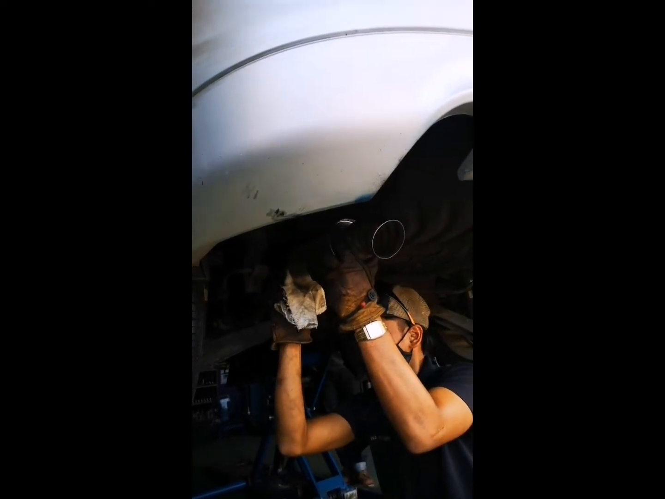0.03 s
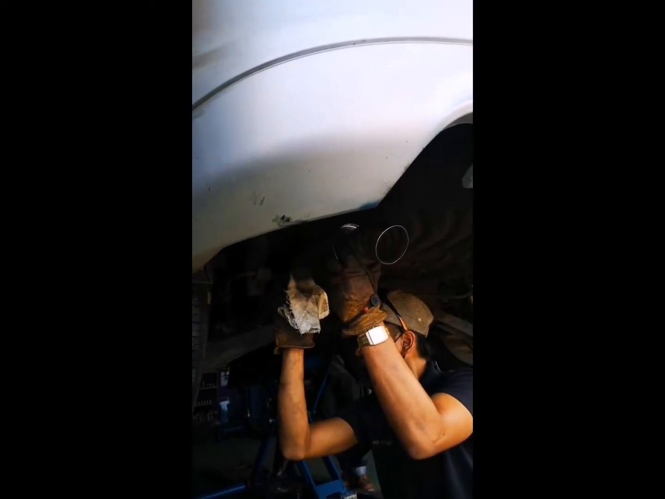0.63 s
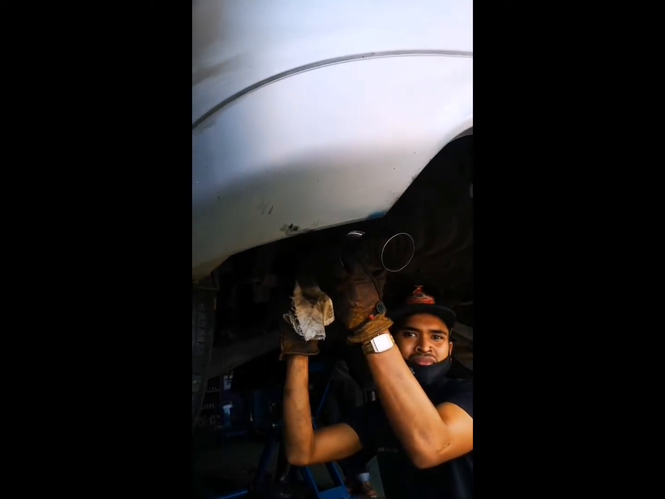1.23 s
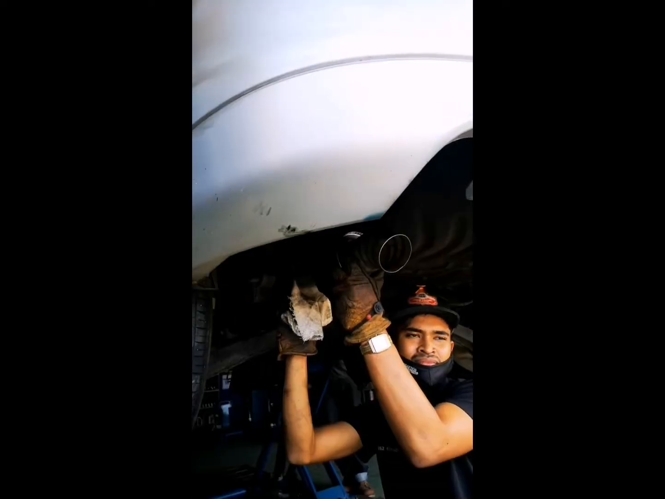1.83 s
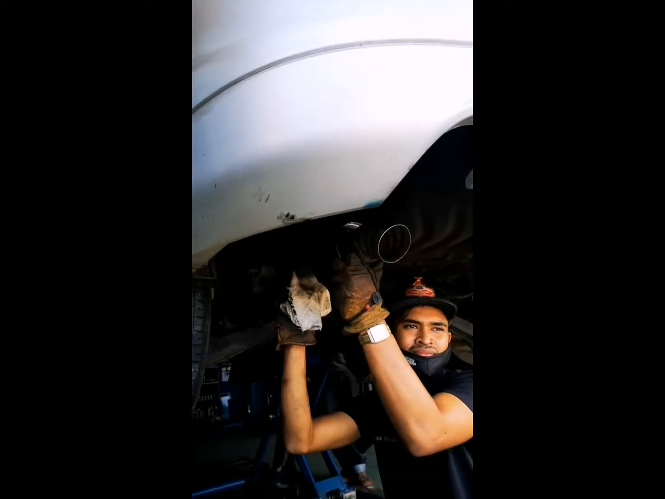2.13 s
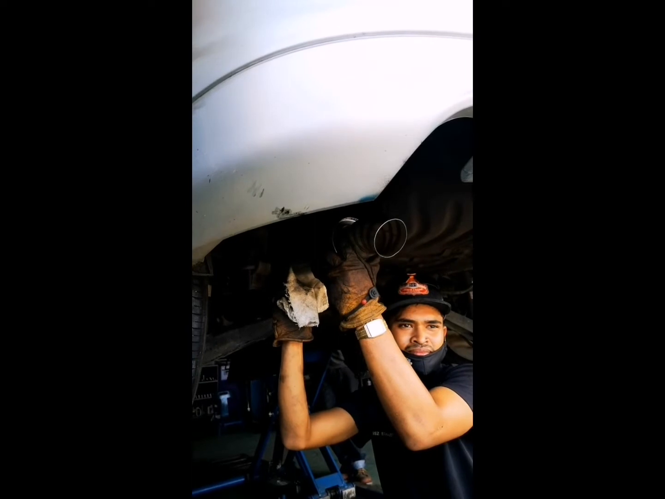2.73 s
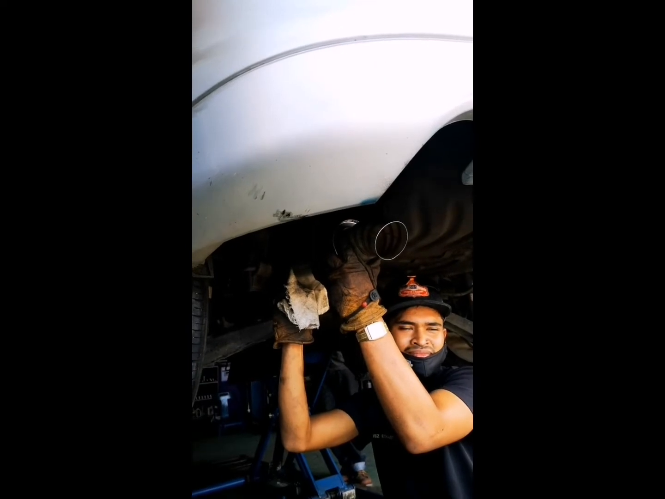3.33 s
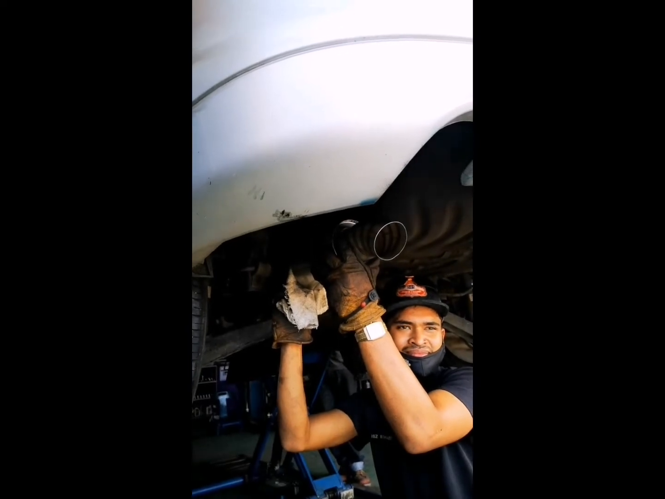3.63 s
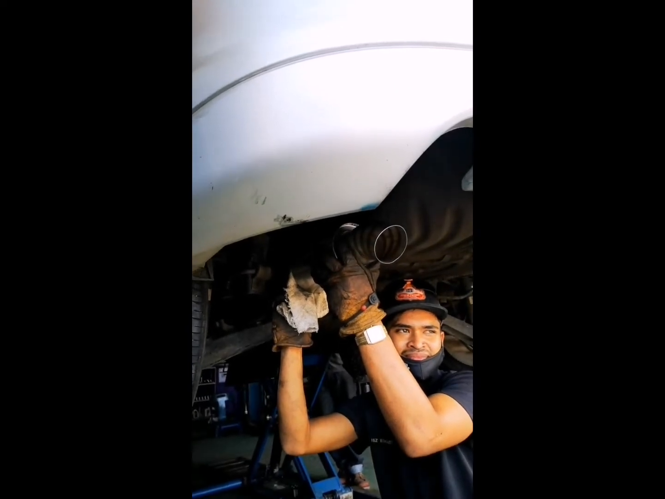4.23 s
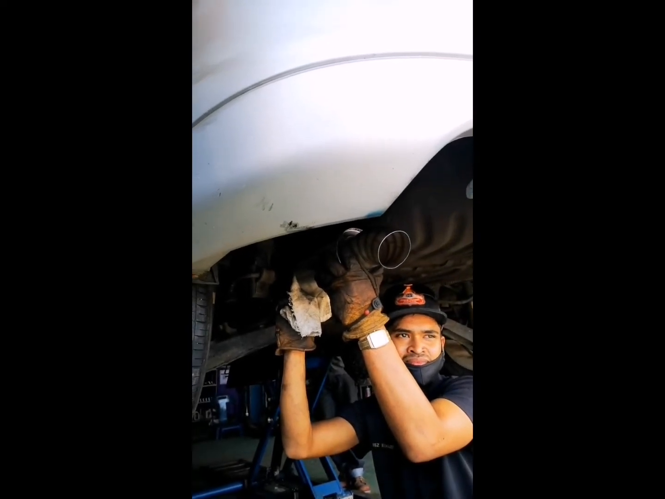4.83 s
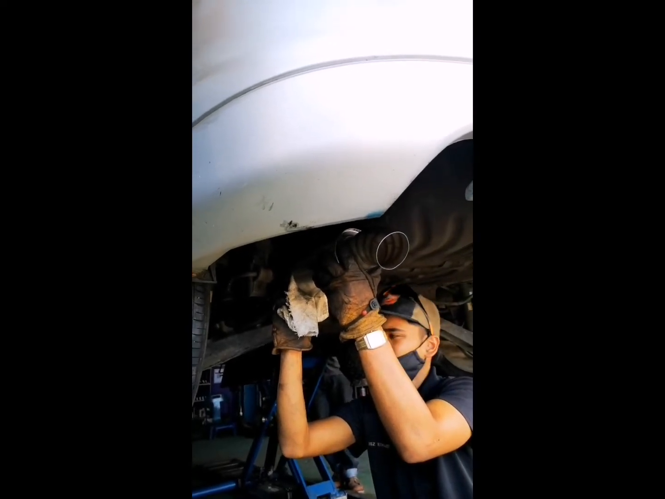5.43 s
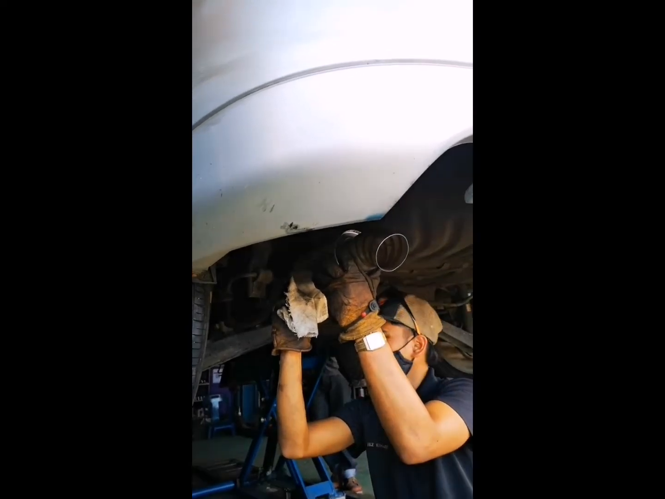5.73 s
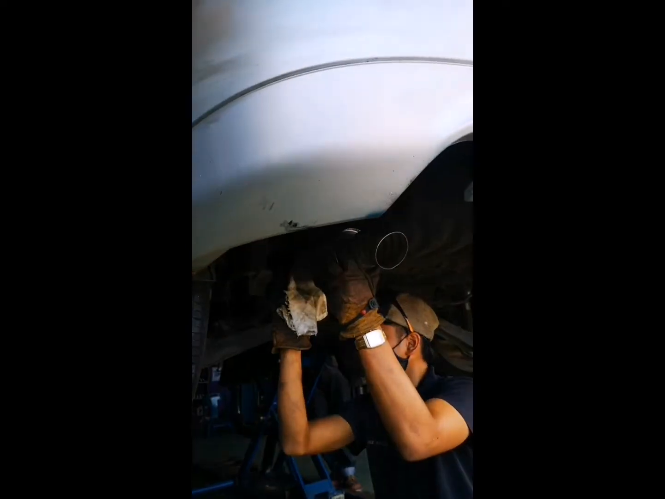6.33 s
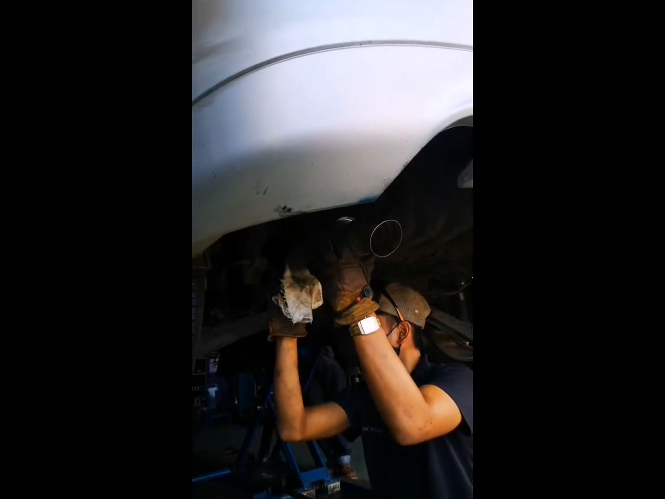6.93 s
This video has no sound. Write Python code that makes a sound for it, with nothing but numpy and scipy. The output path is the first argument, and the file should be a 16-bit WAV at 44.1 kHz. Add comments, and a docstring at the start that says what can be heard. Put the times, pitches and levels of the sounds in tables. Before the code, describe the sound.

Heard in stereo from just behind the tailpipe, a car engine in a workshop goes from a brief, low idle into three revs in a row. The exhaust booms as the pitch rises, then rumbles and burbles as it drops, never settling back to idle. A broad rush and hiss swells with every rev, along with a light belt whine and hollow metallic hoots. The loudest booms briefly push everything else down.

```python
"""Three revs in the workshop

A four-cylinder car idles on a lift and is revved three times; a stereo pair stands close to the
tailpipe. Firing pulses boom through the pipe, turn uneven and burble as the throttle shuts, and the
silencer shell rings. Gas, fan and belts rush and whine with the engine speed; a thin whistle sounds
at idle. The recorder's gain control ducks everything, the rushing too, under the loudest booms."""
import sys
import numpy as np
from scipy import signal
from scipy.fft import rfft, irfft
from scipy.io import wavfile
from scipy.ndimage import uniform_filter1d, minimum_filter1d

SR = 44100
rng = np.random.default_rng(int(sys.argv[2]) if len(sys.argv) > 2 else 0)


def wav_record(signal):
    """Record a signal, one row per channel, as 16-bit PCM in the file named by sys.argv[1]."""
    frames = np.transpose(np.atleast_2d(signal))
    bounded = np.clip(frames, -1, 1)
    # unit amplitude maps onto the largest positive 16-bit level
    quanta = np.round(bounded * 32767).astype(np.int16)
    wavfile.write(sys.argv[1], SR, quanta)


N = 308259
TIME = np.arange(N) / SR
BINS = np.maximum(np.arange(N // 2 + 1) * SR / N, 1)  # Hz


def from_db(db):
    """Decibels to gain."""
    return 10 ** (np.asarray(db) / 20)


def rms_one(x):
    """Scale to unit power."""
    return x / np.sqrt(np.mean(x ** 2) + 1e-20)


def columns_at(rows, where):
    """Read a table along its first column, a time or an engine speed."""
    axis, *columns = np.transpose(rows)
    return [np.interp(where, axis, column) for column in columns]


def at_hz(points, hz):
    """Read a table on a log-frequency axis."""
    frequencies, values = np.transpose(points)
    return np.interp(np.log(hz), np.log(frequencies), values)


def colour(x, spectrum):
    """Give a steady sound a spectrum; rms 1."""
    return rms_one(irfft(rfft(x) * from_db(at_hz(spectrum, BINS)), N))


def drift(rate_hz):
    """Slow random wandering with spread 1, drawn at every 16th sample."""
    count = N // 16 + 2
    hz = np.arange(count // 2 + 1) * SR / N
    slow = irfft(rfft(rng.standard_normal(count)) / (1 + (hz / rate_hz) ** 2) ** 2, count)
    return np.interp(np.arange(N) / 16, np.arange(count), rms_one(slow))


def narrow_tone(turns, width_hz):
    """A resonance fed by turbulence: a tone that wanders in level and phase; rms 1."""
    return drift(width_hz) * np.cos(2 * np.pi * turns) + drift(width_hz) * np.sin(2 * np.pi * turns)


def swell(at_s, db, rise_db_per_s, fall_db_per_s):
    """Gain of one swell that peaks at the given time."""
    return from_db(db - np.maximum(rise_db_per_s * (at_s - TIME), fall_db_per_s * (TIME - at_s)))


# how alike diffuse noise is at the two microphones: (frequency [Hz], correlation [-1..1])
MIC_LIKENESS = [(200, .8), (450, -0.67), (650, -0.4), (1050, -0.0032), (1550, 0.24), (2100, -0.15),
                (2800, -0.15), (3800, -0.025), (5300, -0.068), (6500, 0.88), (9200, 0.81), (14000, 0.93)]
# sheet-metal resonances that colour that noise: (frequency [Hz], width [Hz], lift [dB])
SHEET_METAL = [(1181, 60, 2), (1370, 36, 3), (1516, 30, 4), (1925, 50, 2), (2370, 30, 2), (2751, 30, 3.5),
               (5184, 40, 3), (5927, 36, 2.5), (7615, 30, 2.5)]

def wide_noise(spectrum):
    """Noise scattered to the microphones by the floor and underbody; its middle has rms 1."""
    alike = np.clip(at_hz(MIC_LIKENESS, BINS), -.99, .99)
    lift_db = sum(db / (1 + (2 * (BINS - hz) / width) ** 2) for hz, width, db in SHEET_METAL)
    mid, side = rfft(rng.standard_normal((2, N))) * from_db(at_hz(spectrum, BINS) + lift_db)
    side = side * np.sqrt((1 - alike) / (1 + alike))
    pair = irfft(np.array([mid + side, mid - side]), N)
    return pair / np.sqrt(np.mean(pair.mean(axis=0) ** 2))


# room tone all round the microphones: (frequency [Hz], relative density [dB])
ROOM_SPECTRUM = [(30, -23), (300, -4), (650, 6), (1000, 13), (1400, 3), (1800, 3), (2700, -9), (3500, -31),
                 (5500, -54), (8500, 4), (10500, -8), (13000, -42)]

def room_tone(level_db=-46):
    """The steady air of the workshop."""
    return from_db(level_db) * wide_noise(ROOM_SPECTRUM)


# idle, then three climbs and falls: (time [s], speed [firings/s])
ENGINE_SPEED = [(0.0, 29.8), (0.45, 29.6), (0.595, 41.7), (1.095, 126.1), (1.224, 135.8), (1.431, 131.0),
                (1.603, 121.4), (2.019, 103.4), (2.141, 95.7), (2.543, 76.9), (2.63, 80.5), (3.106, 150.9),
                (3.267, 153.9), (3.563, 138.1), (4.044, 118.7), (4.271, 107.5), (4.758, 81.4),
                (4.851, 84.9), (5.297, 148.7), (5.5, 168.9), (5.56, 167.8), (6.737, 114.0), (6.99, 101.7)]

def engine_speed():
    """Firings per second, with the corners of each rev rounded."""
    return uniform_filter1d(columns_at(ENGINE_SPEED, TIME)[0], size=2000, mode="nearest")


# throttle blips: (opens [s], shuts [s], boom lift [dB], overrun lift of harmonics 2 and 3 [dB])
BLIPS = [(0.507, 1.202, 1, -3), (2.523, 3.128, .7, 0.5), (4.767, 5.331, 0.5, 2)]
OPEN_S, SHUT_S = 0.068, 0.25  # time for the load to build and to die away

def pull(opens, shuts):
    """Load during one blip, 0 to 1: attack, hold, release."""
    return np.clip(np.minimum((TIME - opens) / OPEN_S, 1 - (TIME - shuts) / SHUT_S), 0, 1)


def throttle():
    """0 at idle and on the overrun, 1 while the engine pulls hard."""
    return sum(pull(opens, shuts) for opens, shuts, *_ in BLIPS)


def overruns(after_s=0.19, build_s=0.16):
    """One row per blip: 1 while the engine coasts down starved of air, until the throttle next opens."""
    reopens = [blip[0] for blip in BLIPS[1:]] + [np.inf]
    ramps = [np.minimum((TIME - shuts - after_s) / build_s, (end - TIME) / OPEN_S)
             for (_, shuts, *_), end in zip(BLIPS, reopens)]
    return np.clip(ramps, 0, 1)


# at the throttle, the far end of the car: (time [s], pitch [Hz], relative level [dB])
IDLE_WHISTLE = [(0, 4300, -52), (.18, 4300, -55.5), (.3, 4230, -57), (.39, 4320, -56), (.52, 4430, -47),
                (.58, 4460, -48), (.65, 4430, -51), (.7, 4460, -94)]

def whistle(width_hz=200, gain_db=1):
    """Air whistles past the nearly shut throttle and stops once it opens."""
    hz, level_db = columns_at(IDLE_WHISTLE, TIME)
    return from_db(level_db + gain_db) * narrow_tone(np.cumsum(hz) / SR, width_hz)


# honks from the intake, up front: (time [s], level [dB])
INTAKE_HONKS = [(1.15, -40), (3.12, -31.5), (5.33, -28), (5.47, -38)]

def honk(hz=1150, width_hz=95):
    """A broad resonance of the intake speaks at the top of each pull."""
    level = sum(swell(s, db, rise_db_per_s=104, fall_db_per_s=92) for s, db in INTAKE_HONKS)
    return level * narrow_tone(hz * TIME, width_hz)


# rushing grows with speed: (speed [firings/s], relative bay level [dB], relative hiss level [dB])
RUSH_LEVELS = [(30, -40, -53), (82.6, -34, -41), (111.1, -28.5, -37.5), (169, -25.5, -31)]
# brief surges of the rushing: (time [s], bay lift [dB], hiss lift [dB])
RUSH_SURGES = [(.44, 2, 3.5), (1.08, 1.5, 5.5), (1.78, 3.5, 2.5), (3.33, 2, -0.5), (5.48, 2, 1.5),
               (5.93, 1.5, 0)]
# the engine bay, heard from behind the car: (frequency [Hz], relative density [dB])
BAY_SPECTRUM = [(200, 3), (450, -6.5), (650, -6.5), (850, -1.5), (1100, 2.5), (1270, -1.5), (1520, 5),
                (1700, 3.5), (1950, 3), (2450, 2.2), (2720, 4), (3300, -5), (4300, -11.5), (5600, -5),
                (7000, -11.5), (12000, -46)]
# the gas jet, close to the microphones: (frequency [Hz], relative density [dB])
HISS_SPECTRUM = [(1500, -7), (3300, -1), (3800, 1), (4400, -3), (5200, 1), (5900, 2), (6500, 3), (7600, 6),
                 (8400, 0), (9300, 5.5), (10200, -3.5), (11500, -7.5), (13000, -17), (15000, -23)]

def rush(speed, firings, bay_trim_db=-3.5, hiss_trim_db=-1.57, surge_half_width_s=0.13):
    """Broad noise of the engine bay and of the gas jet, throbbing with the firings."""
    bay_db, hiss_db = columns_at(RUSH_LEVELS, speed)
    for s, bay_lift_db, hiss_lift_db in RUSH_SURGES:
        surge = np.exp(-((TIME - s) / surge_half_width_s) ** 2)
        bay_db += bay_lift_db * surge
        hiss_db += hiss_lift_db * surge
    throb = np.cos(2 * np.pi * firings) + .5 * np.cos(np.pi * firings)
    flicker_db = .5 * drift(40)
    bay = from_db(bay_db + bay_trim_db + flicker_db) * wide_noise(BAY_SPECTRUM)
    gust_db = 1.5 * drift(31)
    hiss = from_db(hiss_db + hiss_trim_db + gust_db) * wide_noise(HISS_SPECTRUM)
    return bay * (1 + 0.049 * throb) + hiss * (1 + 0.022 * throb)


# underbody panels of the car on the lift: (frequency [Hz], width [Hz], relative level [dB])
UNDERBODY_PANELS = [(997, 130, -8.5), (1517, 135, -5), (1306, 49, -5), (910, 420, -1.5)]

def panel_response(hz, lowest_hz=830):
    """Gain of the underbody panels for a tone that sweeps through them; low tones hardly move them."""
    power = sum(from_db(db) ** 2 / (1 + (2 * (hz - centre) / width) ** 2)
                for centre, width, db in UNDERBODY_PANELS)
    return np.sqrt(power / (1 + (lowest_hz / hz) ** 10))


def rasp(speed, firings, trim_db=-19.0, load_db=5.5, width_hz=26):
    """High firing harmonics swell as they sweep through the panel resonances, more so under load."""
    bay_db, _ = columns_at(RUSH_LEVELS, speed)
    out = np.zeros((2, N))
    for k in range(4, 12):
        near = narrow_tone(k * firings, width_hz)
        scattered = narrow_tone(k * firings, width_hz) * np.array([[1], [-1]])
        out += panel_response(k * speed) * (near + 1.1 * scattered)
    return from_db(bay_db + trim_db + load_db * throttle()) * out


# belt-driven parts in the bay: (pitch [multiple of the firing rate], relative level [dB])
BELT_TONES = [(8.35, -14.5), (11.75, -7.5), (12.15, -8)]

def whine(speed, firings, width_hz=30, alternator_multiple=18.05, alternator_db=-17):
    """Pumps and alternator sing at their own multiples of the engine speed, louder as it climbs."""
    bay_db, _ = columns_at(RUSH_LEVELS, speed)
    pumps = sum(from_db(db) * panel_response(multiple * speed) * narrow_tone(multiple * firings, width_hz)
                for multiple, db in BELT_TONES)
    alternator = from_db(alternator_db) * narrow_tone(alternator_multiple * firings, width_hz)
    return from_db(bay_db) * (pumps * (speed / 130) ** 0.96 + alternator * (speed / 150) ** 2)


# faint ringing of the silencer, just up the pipe: (speed [firings/s], relative level [dB])
SHELL_RING = [(30, -65), (80, -46.5), (120, -43.5), (168, -41.5)]
# its hoots, as when a harmonic sweeps through the mode: (time [s], relative level [dB])
SHELL_HOOTS = [(1.47, -25.5), (2.03, -35.5), (2.28, -38), (3.09, -35.5), (3.48, -30), (3.79, -29.5),
               (5.3, -32), (5.51, -31.5), (5.8, -35.5), (6.19, -29), (6.43, -32.5)]

def silencer_shell(speed, hz=530.0, width_hz=16, wander_hz=4.52, trim_db=-2.0):
    """One lightly damped mode of the shaken silencer rings, wandering a little in pitch."""
    turns = np.cumsum(hz + wander_hz * drift(6.75)) / SR
    ringing = narrow_tone(turns, width_hz) + 1.7 * np.sin(2 * np.pi * turns)
    faint = from_db(columns_at(SHELL_RING, speed)[0])
    hoots = sum(swell(s, db, rise_db_per_s=124, fall_db_per_s=188) for s, db in SHELL_HOOTS)
    return from_db(trim_db) * np.hypot(faint, hoots) * rms_one(ringing)


def pop(at_s=2.379, hz=275, decay_s=0.0068, gain_db=-10):
    """One late-burning charge thuds in the pipe on the overrun."""
    age = np.clip(TIME - at_s, 0, .2)
    envelope = np.exp(-age / decay_s) - np.exp(-age * 5 / decay_s)
    return from_db(gain_db) * envelope * np.sin(2 * np.pi * hz * age)


# burble at the tailpipe: (speed [firings/s], deep base level [dB], upper base level [dB])
BURBLE_LEVELS = [(30, -47, -30), (80, -38, -23.5), (112, -42, -23), (133.6, -41, -27.5), (168, -42, -28)]
# its deep thumps: (frequency [Hz], relative density [dB])
DEEP_SPECTRUM = [(10, -19), (30, -13), (45, 12), (62, 19), (88, 21), (108, -6), (150, -46)]
# its upper band: (frequency [Hz], relative density [dB])
UPPER_SPECTRUM = [(80, -10), (125, -3), (165, -1.5), (205, -1.5), (255, 3.5), (275, -2.5), (297, -13),
                  (335, -10.5), (375, -23), (460, -21.5), (700, -38), (1500, -68)]

def burble(speed, firings):
    """No two firings are equally strong, least of all on the overrun; the odd ones thump in the pipe."""
    fired = np.flatnonzero(np.diff(np.floor(firings)))
    load, starved = throttle(), overruns().sum(axis=0)
    deep_db, upper_db = columns_at(BURBLE_LEVELS, speed)
    deep_db += 15 * load + 16.5 * starved
    upper_db += 8 * load * speed / 130 - starved
    out = np.zeros(N)
    for level_db, spectrum in (deep_db, DEEP_SPECTRUM), (upper_db, UPPER_SPECTRUM):
        kicks = np.zeros(N)
        kicks[fired] = rng.standard_normal(1000)[:len(fired)]
        thumps = colour(rms_one(kicks) + rng.standard_normal(N), spectrum)
        running_rms = np.sqrt(uniform_filter1d(thumps ** 2, size=7000) + 1e-6)
        out += from_db(level_db) * thumps / running_rms
    return out


# exhaust resonances up close, harmonics 1-3: (frequency [Hz], coasting gain [dB], pulling gain [dB])
PIPE_BOOM = [(29.7, -28, -20), (41.3, -9, -12), (63, -15, -6), (79.5, 1.5, -1.5), (90.1, -14.5, -0.5),
             (110, -28, -14), (122, -22, -9), (136.3, -10, -19.5), (167.4, -10.5, -2.5), (185.5, -23.5, -8),
             (206.5, -11, -5.5), (262, -13, -1), (301.2, -46.5, -16.5), (320, -39.5, -19),
             (334.8, -22.5, -20), (354, -40, -30.5), (397, -50, -24.5), (460, -58, -60)]
# passband of the exhaust for the higher harmonics: (frequency [Hz], gain [dB])
PIPE_PASSBAND = [(100, -22), (120, -6), (150, -2.5), (180, 1), (210, 1), (245, -4), (275, -42), (297, -25),
                 (328, -17.5), (370, -32), (420, -26.5), (470, -71), (700, -64)]

def firing_pulses(speed, firings, jitter_turns=0.0027, smear_rad=0.358, skew_rad=0.6, db_per_octave=-4):
    """Each firing is a pressure pulse, slightly early or late; the pipe smears it into a short chirp."""
    load, starved = throttle(), overruns().sum(axis=0)
    blip_db = sum(db * pull(opens, shuts) for opens, shuts, db, _ in BLIPS)
    overtones_db = np.array(BLIPS)[:, -1] @ overruns()
    coasting, pulling = np.array(PIPE_BOOM)[:, [0, 1]], np.array(PIPE_BOOM)[:, [0, 2]]
    turns = firings + jitter_turns * drift(30)
    # higher harmonics are strongest while the pulses are slow and separate, and under load
    edge_db = -27 - 17 * np.log10(speed / 30) + 27 * load * np.minimum(speed / 80, 1)
    out = np.zeros(N)
    for k in range(1, 14):
        if k < 4:
            coast_db = at_hz(coasting, k * speed) + overtones_db * (k > 1)
            coast_db -= 4.5 * (k == 3)  # unloaded pulses are rounder
            coast_db += 1.1 * starved * drift(13)  # the level wavers on the overrun
            level_db = (1 - load) * coast_db + load * at_hz(pulling, k * speed)
            level_db += db_per_octave * np.log2(k) + blip_db
        else:
            level_db = edge_db + at_hz(PIPE_PASSBAND, k * speed)
        out += from_db(level_db) * np.cos(2 * np.pi * k * turns - smear_rad * k * k / 2 + skew_rad)
    flutter_db = 0.93 * drift(24)
    return np.sqrt(2) * out * from_db(flutter_db)


# the pipe reaches the right microphone first: (frequency [Hz], phase lead [rad])
RIGHT_MIC_LEAD = [(40, 0.15), (190, 0.24), (250, 0.7), (310, 1.4), (400, 1.25), (530, 2.13)]

def tailpipe(speed, firings):
    """The whole exhaust, close to the microphones and slightly to the right."""
    exhaust = firing_pulses(speed, firings) + burble(speed, firings) + silencer_shell(speed) + pop()
    side = 1j * np.tan(at_hz(RIGHT_MIC_LEAD, BINS) / 2)
    return irfft(rfft(exhaust) * np.array([1 - side, 1 + side]), N)


# balance of the two microphones: (frequency [Hz], left minus right [dB])
MIC_BALANCE = [(200, 0), (320, 0.2), (520, -4.5), (1300, -4), (2300, -5.5), (4300, -5.5), (7800, -1),
               (14000, 0)]

def scene():
    """From behind the lift: the tailpipe close by, the engine bay diffuse, the workshop all round."""
    speed = engine_speed()
    firings = np.cumsum(speed) / SR
    pipe = tailpipe(speed, firings)
    engine = rush(speed, firings) + rasp(speed, firings) + whine(speed, firings) + honk() + whistle()
    mix = pipe + engine + room_tone()
    lean = from_db(at_hz(MIC_BALANCE, BINS) * np.array([[.5], [-.5]]))
    return irfft(rfft(mix) * lean / np.sqrt(np.mean(lean ** 2, axis=0)), N)


def gain_control(x, above_db=-10, share=0.81, attack_s=0.044, recover_db_per_s=21.5):
    """The recorder's gain drops quickly under a loud boom and creeps back afterwards."""
    keep = np.exp(-1 / (attack_s * SR))
    power = signal.lfilter([1 - keep], [1, -keep], x.mean(axis=0) ** 2)
    over_db = share * np.maximum(10 * np.log10(power + 1e-9) - above_db, 0)
    recovery_db = recover_db_per_s * TIME
    held_db = np.maximum.accumulate(over_db + recovery_db) - recovery_db
    return x * from_db(-uniform_filter1d(held_db, size=4400))


def record(dry, ceiling=.95, fade_s=.004, cutoff_hz=15100):
    """Gain control and a limiter duck the loudest booms; the ends are eased and the top is cut."""
    ducked = gain_control(dry)
    headroom = np.minimum(1, ceiling / (np.abs(ducked).max(axis=0) + 1e-9))
    limiter = uniform_filter1d(minimum_filter1d(headroom, size=900), size=900)
    ends = np.sin(np.pi / 2 * np.minimum(1, np.minimum(TIME, TIME[::-1]) / fade_s)) ** 2
    lowpass = signal.ellip(12, .1, 90, cutoff_hz, fs=SR, output="sos")
    return signal.sosfilt(lowpass, ends * limiter * ducked)


dry = scene()
out = record(dry)
wav_record(out)
```